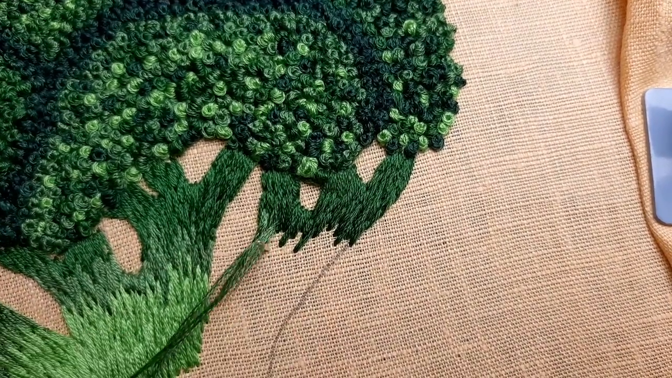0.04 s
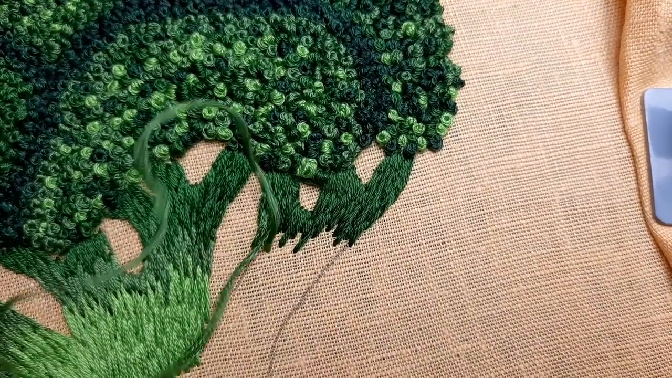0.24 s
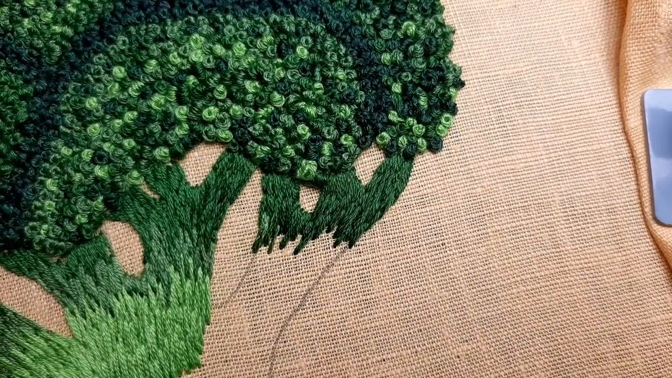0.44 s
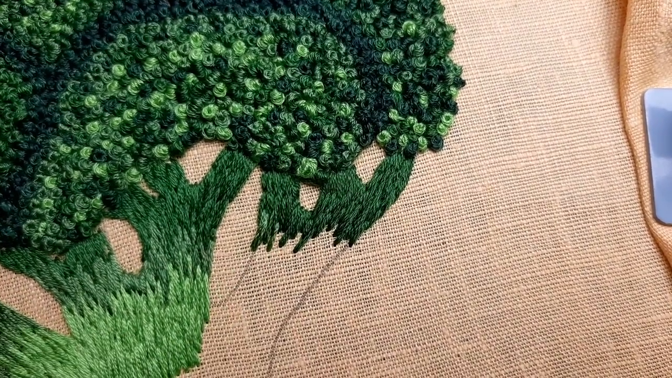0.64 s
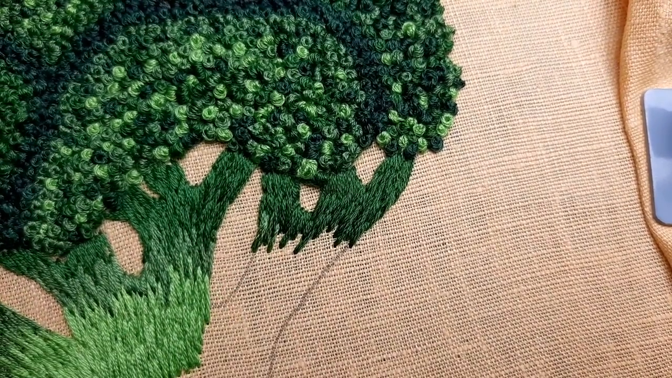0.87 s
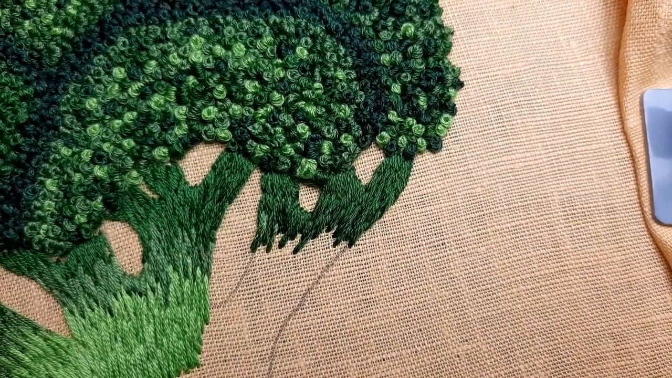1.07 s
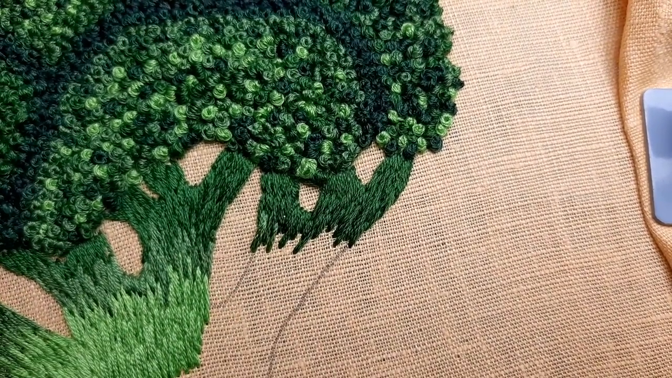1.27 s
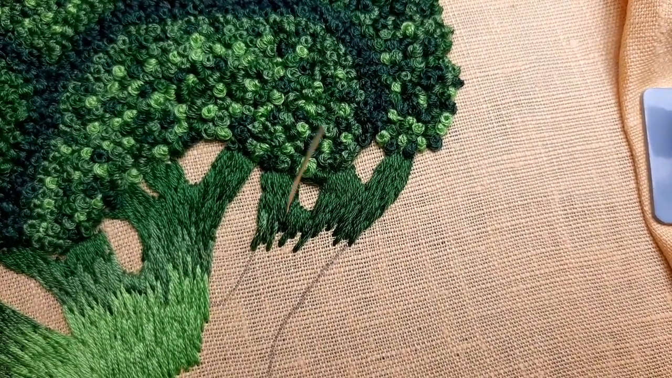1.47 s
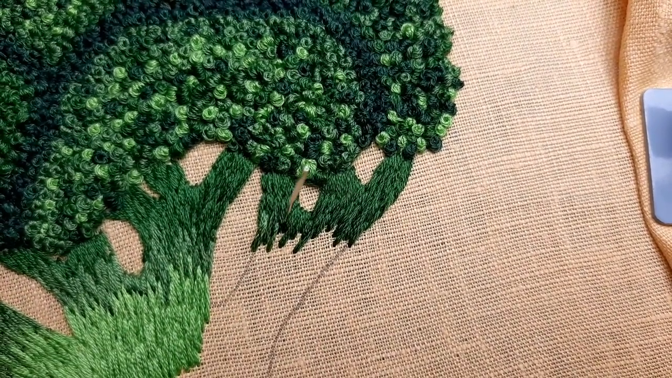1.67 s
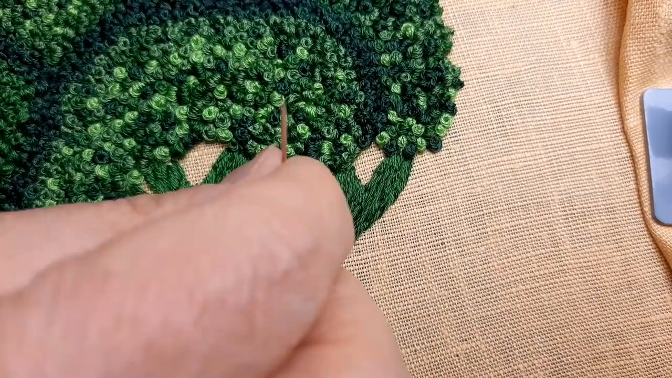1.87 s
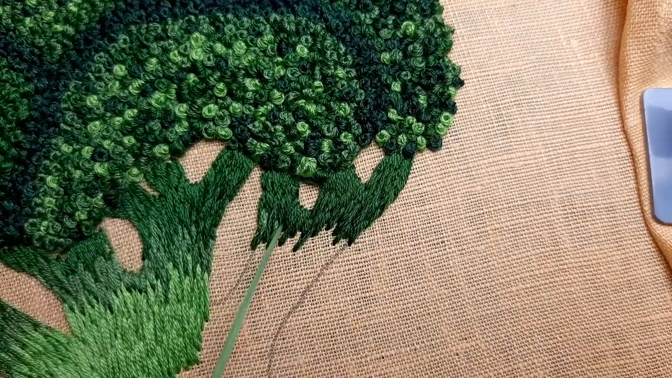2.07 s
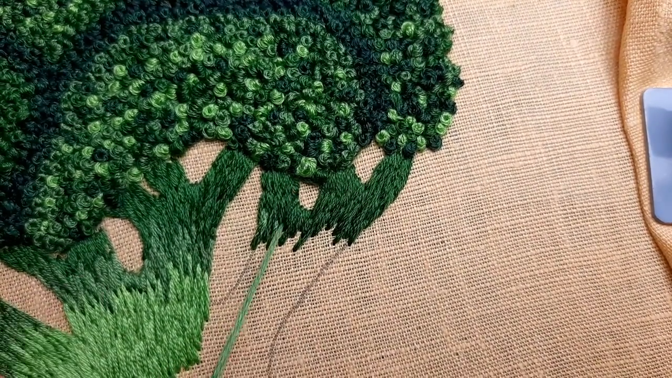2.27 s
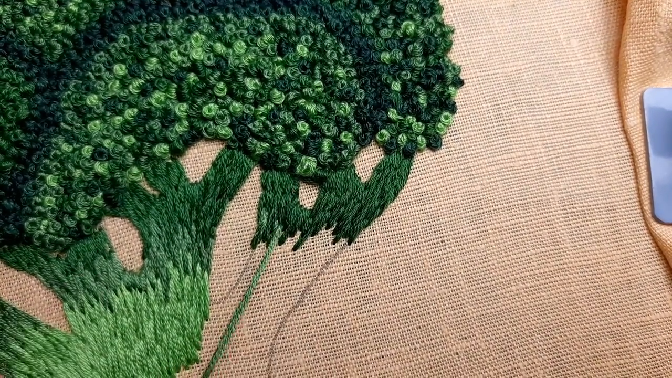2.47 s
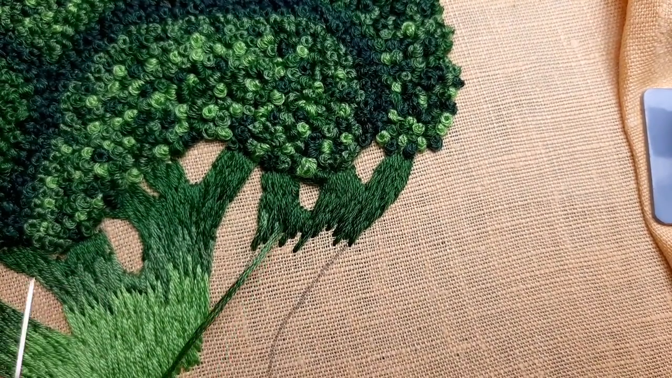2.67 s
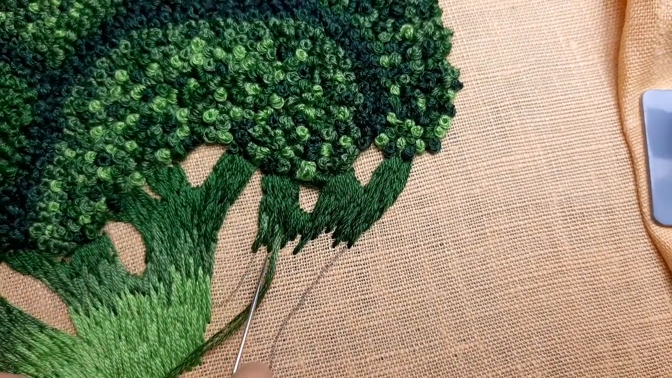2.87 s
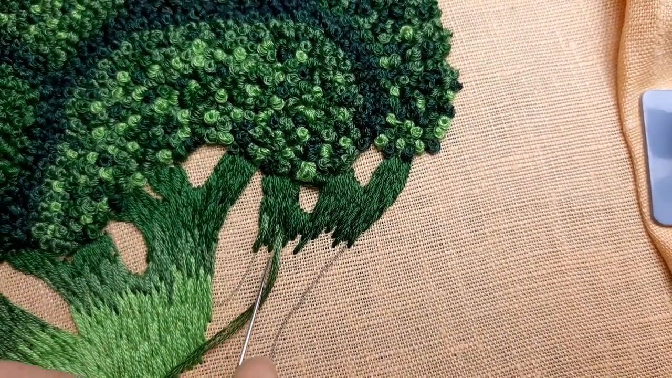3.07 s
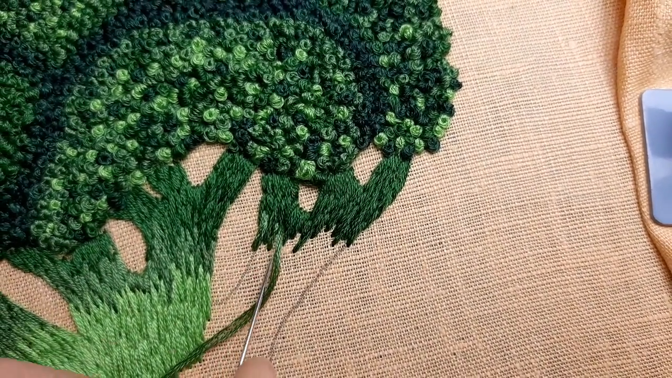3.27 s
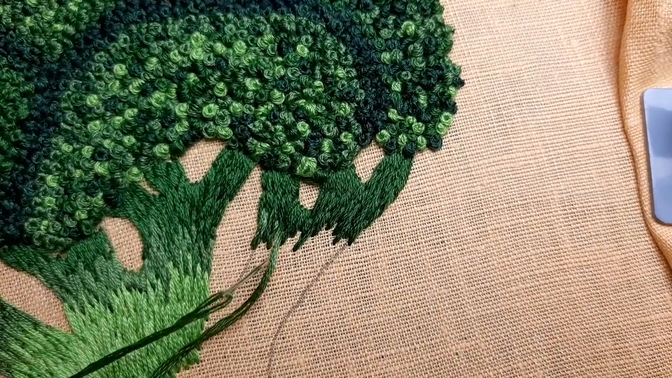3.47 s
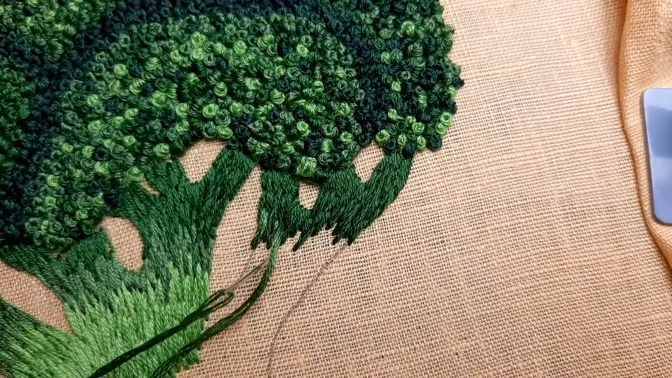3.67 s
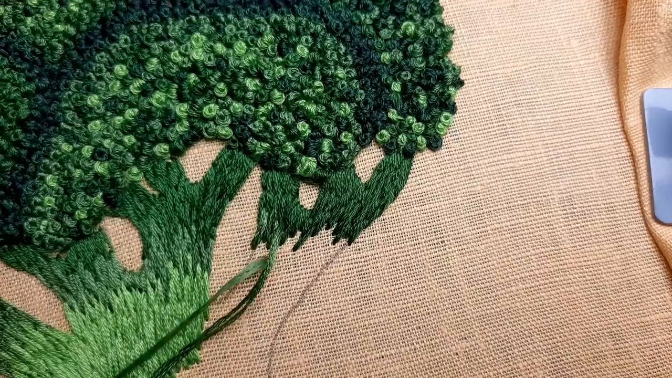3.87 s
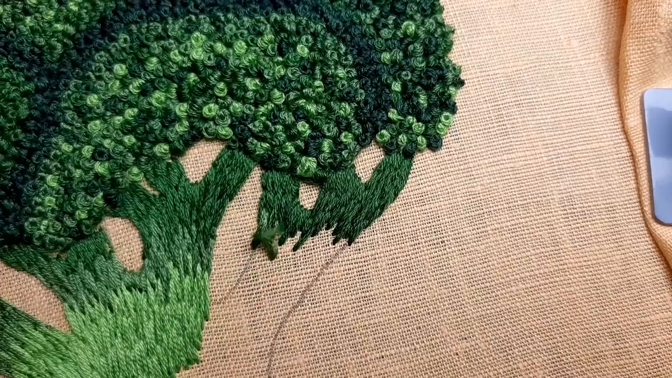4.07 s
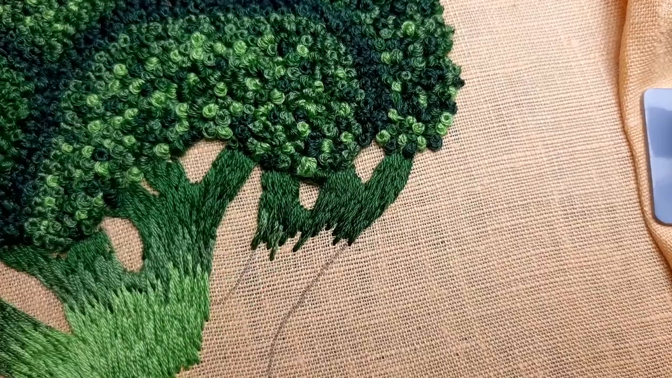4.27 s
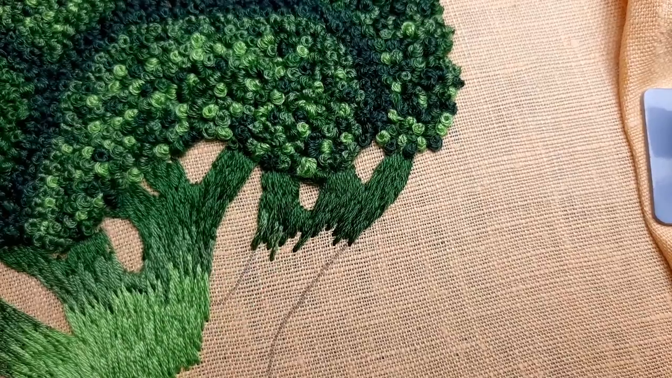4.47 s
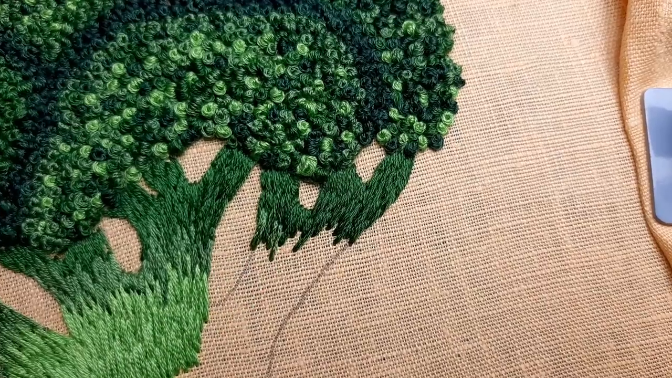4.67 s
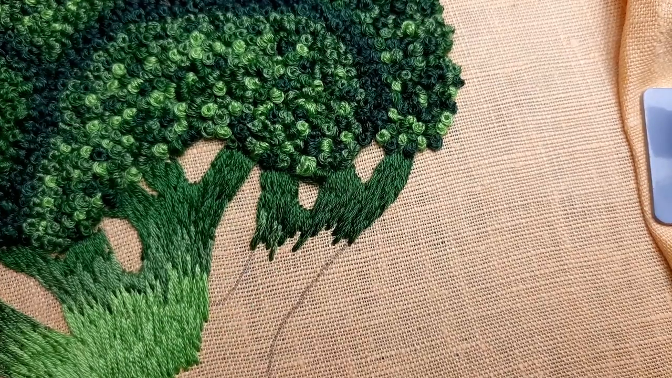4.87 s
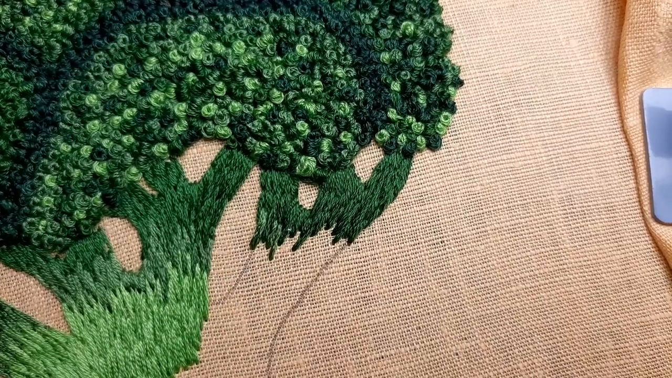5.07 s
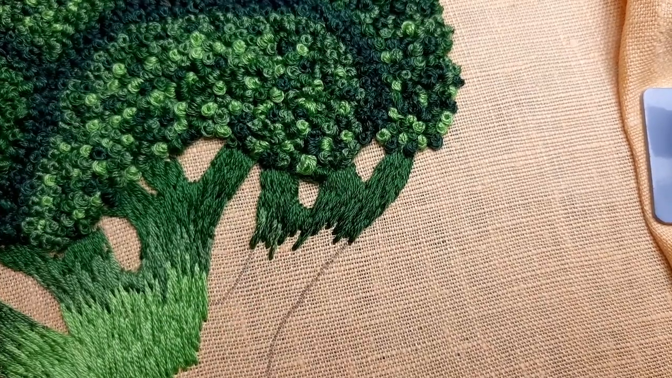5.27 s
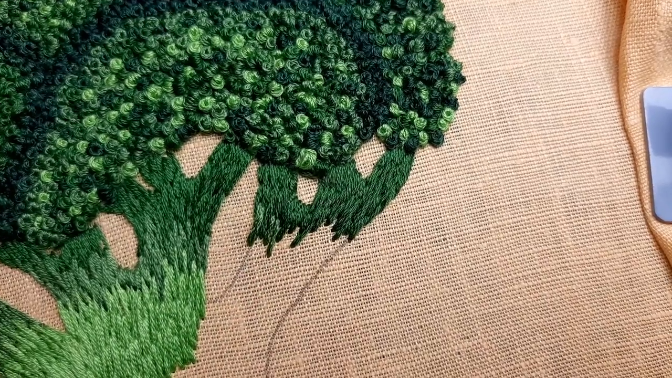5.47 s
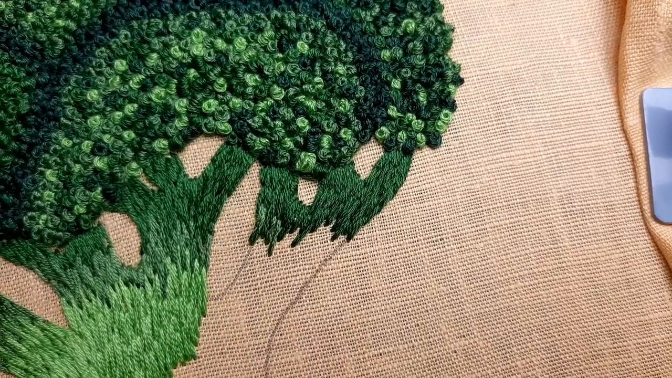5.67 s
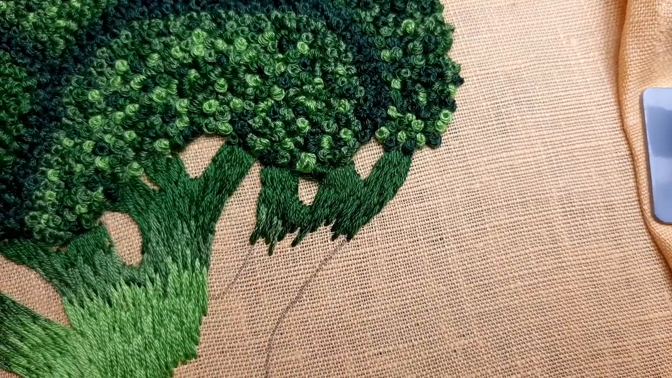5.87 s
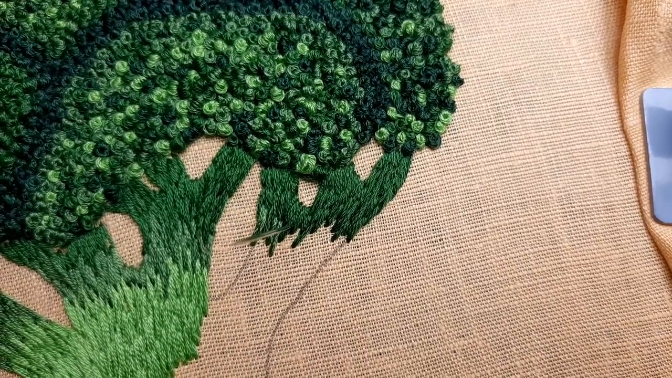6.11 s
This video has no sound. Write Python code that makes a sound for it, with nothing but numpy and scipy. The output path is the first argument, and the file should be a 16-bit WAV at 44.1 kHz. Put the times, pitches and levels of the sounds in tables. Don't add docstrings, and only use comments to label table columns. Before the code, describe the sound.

Hand embroidery heard by a close stereo pair, the work on the right. Three dull, drum-like pops each release a quarter-second scratchy thread pull. Between them fingertips tap and scuff the cloth and the frame murmurs softly. A faint hum wavers early; later a low engine drones through the wall, sags, revs, pulls away and changes gear as a crisp needle strike lands. Dry, quiet room.

```python
import sys
import numpy as np
from scipy import signal
from scipy.io import wavfile
from scipy.ndimage import uniform_filter1d

SR = 44100
rng = np.random.default_rng(int(sys.argv[2]) if len(sys.argv) > 2 else 0)


def master(y):
    cut = np.clip(np.atleast_2d(y).T, -1, 1)
    pcm = np.round(cut * 32767)
    wavfile.write(sys.argv[1], SR, pcm.astype(np.int16))


def invert_db(x):
    u = np.asarray(x, float) / 20
    return 10 ** u


N = 270758


def evened(x):
    return x / np.sqrt(np.mean(x ** 2) + 1e-20)


def read(points, hz):
    f, value = np.transpose(points)
    return np.interp(np.log(hz + 1), np.log(f + 1), value)


def curve(rows, column, rest=None):
    rows = np.array(rows)
    return np.interp(np.arange(N) / SR, rows[:, 0], rows[:, column], rest, rest)


def wander(hz):
    return evened(signal.lfilter(*signal.butter(2, hz, fs=SR), rng.standard_normal(N)))


def swells(rows, column, rise):
    t, power = np.arange(N) / SR, np.zeros(N)
    for row in rows:
        since = (t - row[0]) / row[-1]
        power += invert_db(2 * row[column] - 44.9 * np.maximum(since, -since / rise))
    return np.sqrt(power)


def flat(value):
    return lambda hz: value + 0 * hz


def closed(points, lo_hz=0, hi_hz=SR):
    lowest, highest = max(points[0][0], lo_hz), min(points[-1][0], hi_hz)
    return lambda hz: read(points, hz) - 60 * ((hz < lowest) | (hz > highest))


def noise(colour, same, lean_db, size, patchy_db, count=N):
    late_s = 4 / SR
    hz = np.fft.rfftfreq(size, 1 / SR)
    a, b, c, d, patches = rng.standard_normal((4 * count // size + 5, len(hz), 5)).T
    patches = uniform_filter1d(patches, size=5, axis=0)
    patches = evened(uniform_filter1d(patches, size=12, axis=1))
    same = np.clip(same(hz), 0, 1)[:, None]
    right = a + 1j * b
    left = same * right + np.sqrt(1 - same ** 2) * (c + 1j * d)
    left = left * np.exp(-2j * np.pi * hz * late_s)[:, None]
    lean = invert_db(lean_db(hz) / 2)[:, None]
    z = np.array([left * lean, right / lean]) * invert_db(colour(hz)[:, None] + patchy_db * patches)
    out = signal.istft(z, nperseg=size, noverlap=3 * size // 4)[1][:, :count]
    return out / np.sqrt(np.mean(out.mean(0) ** 2))


# (frequency [Hz], left minus right [dB])
WORK_LEAN = [(60, -14.5), (130, -22.5), (290, -24), (640, -12.5), (1410, -4), (3100, -16), (6820, -15.5),
             (15000, -8.5)]
# (frequency [Hz], left-right coherence [0-1])
WORK_LIKENESS = [(60, 0.44), (250, 0.79), (500, 0.39), (1000, 0.9946), (2000, 0.9), (15000, 0.52)]


def near(colour, size, patchy_db, count=N):
    return noise(colour, lambda hz: read(WORK_LIKENESS, hz), lambda hz: read(WORK_LEAN, hz),
                 size, patchy_db, count)


# (frequency [Hz], level [dB], t60 [s])
DRUM_MODES = [(95.2, -10.5, 0.41), (128, -11, 0.12), (175.2, -3, 0.22), (215.6, -2.5, 0.14),
              (251.2, 10, 0.083), (299, 5.5, 0.063), (338, 0, 0.059), (449, -7.5, 0.13), (700, -4, 0.052),
              (1026, -13.5, 0.064)]


def knocks(rows, spots_db, snap_hz, ticks_db, dull, soft_db, damping, strain_db, bounce_db,
           tick_s, snap_s, tail_db, tail_s):
    out, t = np.zeros((2, N + SR)), np.arange(SR // 2) / SR
    early = round(0.0063329 * SR)
    sides = rng.random((len(rows), len(DRUM_MODES)))
    ticks_db = np.resize(ticks_db, len(rows))
    for (s, snap_db, blow_db, lean_db, tune), side, spot_db, tick_db in zip(rows, sides, spots_db, ticks_db):
        ring = np.zeros((2, len(t)))
        for (hz, db, t60), a, b in zip(DRUM_MODES, spot_db, side):
            late = np.array([[0.41 * (b - 0.5)], [0]])
            swing = np.sin(2 * np.pi * hz * tune ** (hz > 200) * t - 0.8 - late)
            swing *= (1 - np.exp(-2.5 * hz * t)) ** 2
            ring += invert_db(db + soft_db * (hz > 400) + a - 60 * damping * t / t60) * swing
        blows = np.zeros(early + round(0.03 * SR))
        bounce = early + round((0.015 + 0.006 * rng.random()) * SR)
        blows[[0, early, bounce]] = -invert_db(strain_db), 1, -invert_db(bounce_db)
        sound = signal.fftconvolve(ring / abs(ring.mean(0)).max(), blows[None], axes=1)[:, :len(t)]
        sound *= invert_db(blow_db + 1.5)

        fibres = rng.standard_normal((2, len(t))) + 0.44 * rng.standard_normal(len(t))
        fibres += 4.77 * (t == 0)
        tick = signal.lfilter(*signal.butter(1, [2000, 10000], "band", fs=SR), fibres)
        tick += dull * (signal.lfilter(*signal.iirnotch(5700, 1.6, SR), tick) - tick)
        tick *= invert_db(snap_db + tick_db) * (np.exp(-t / tick_s) + invert_db(tail_db) * np.exp(-t / tail_s))
        snap = signal.lfilter(*signal.butter(2, [600, snap_hz], "band", fs=SR), fibres)
        snap *= invert_db(snap_db + 9) * (np.exp(-t / tick_s) + 0.27 * np.exp(-t / snap_s))
        sound[:, early:] += (tick + snap)[:, :-early]
        at = round(s * SR) - early
        out[:, at:at + len(t)] += sound * invert_db([[lean_db / 2], [-lean_db / 2]])
    return signal.sosfilt(signal.butter(6, 80, "high", fs=SR, output="sos"), out[:, :N])


# (time [s], snap [dB], blow [dB], left minus right [dB], drum tuning [factor])
NEEDLE_POPS = [
    (0.1275, -36, -23.5, -14.5, 0.93),
    (1.932, -43.5, -19, -11, 0.94),
    (3.8567, -40.5, -22.5, -14, 1.028),
]
# (level on each drum mode [dB], ..)
NEEDLE_SPOTS = [
    [0, -3, 5.5, -1.5, 1, -0.5, -6, -3, 0.32, 0],
    [0, 7, 4.4, 2, -2, -2.5, 0, 0, 1.1, 0],
    [0, 6.5, 3, 3, 2, -2.5, -4, 7, 0, 0],
]


def pops():
    return knocks(NEEDLE_POPS, NEEDLE_SPOTS, snap_hz=1990, ticks_db=[-15, -16, -11.5], dull=0.48,
                  soft_db=1.2, damping=1.48, strain_db=-16, bounce_db=-10.5,
                  tick_s=0.00055, snap_s=0.0099, tail_db=-7.5, tail_s=0.012)


# (time [s], snap [dB], blow [dB], left minus right [dB], drum tuning [factor])
POINT_STRIKES = [
    (2.8593, -36, -38.5, -11, 1.161),
    (5.0412, -33, -21, -10.5, 1.045),
]
# (level on each drum mode [dB], ..)
POINT_SPOTS = [
    [-5, 0, 3, 3.4, 0.7, -1.5, 5, 2.5, 4, 0],
    [-0.5, 0, -4.5, 5.9, -1.6, -2, 1, 0, 2, 0],
]


def pierces():
    return knocks(POINT_STRIKES, POINT_SPOTS, snap_hz=2100, ticks_db=[-11.5, 0.5], dull=0.05,
                  soft_db=-1.2, damping=1.76, strain_db=-47, bounce_db=-15,
                  tick_s=0.00061, snap_s=0.0082, tail_db=-21.5, tail_s=0.02)


# (start [s], length [s], drag [dB], fibre hiss [dB],
# early peak of the speed arch [exponent], hiss share of the length [0-1])
THREAD_PULLS = [
    (0.135, .29, -53.5, -58, 0.66, 0.93),
    (1.942, .29, -52.5, -61, 0.63, 1),
    (2.151, 0.23, -61.5, -75, 0.75, 1),
    (3.862, .26, -52, -56, 0.66, 0.99),
]
# (frequency [Hz], density [dB per Hz])
PULL_COLOURS = [
    [(350, -5), (600, 2.5), (726, -7), (788, 9), (1190, 0), (1500, 7.5), (1840, -13), (2060, -6),
     (2300, -15.5), (3790, -20), (4300, -17), (4660, -14.5), (5120, -28), (5790, -30), (9090, -17.5),
     (10900, -24.5), (15700, -17.5)],
    [(350, -11), (490, -5.5), (600, -21), (651, -22), (717, -0.5), (1240, -7), (1540, -2), (1770, -13.5),
     (2380, -19.5), (3400, -35.5), (4150, -28), (4500, -20), (5050, -36), (5800, -28), (6250, -21.5),
     (6920, -32.5), (8730, -28), (15700, -26)],
    [(350, -49), (600, -16), (717, 2.5), (981, -1.5), (1080, -3), (1290, -10.5), (1520, 3), (1940, -22.5),
     (2170, -7.5), (2600, -19), (4660, -17.5), (5560, -36), (7010, -19), (9730, -21), (15700, -23.5)],
]
# (frequency [Hz], density [dB per Hz])
SLOW_COLOUR = [(350, -7), (485, -5), (560, -22), (740, -16), (1190, -30.5), (1500, -16.5), (1850, -30),
               (2600, -41), (4500, -42), (5200, -42), (6200, -34), (7000, -41), (15700, -34)]


def thread():
    split_hz, grain_db = 1800, 2.0
    jerk_db, jerk_s = 12.5, 0.015
    running_start, db_per_decade = 0.06, 27
    squareness = np.array([[2.84], [1.8]])
    out = np.zeros((2, N))
    colours = PULL_COLOURS[:2] + [SLOW_COLOUR] + PULL_COLOURS[2:]
    for (start, length, drag_db, hiss_db, early, share), colour in zip(THREAD_PULLS, colours):
        t = np.arange(0, length, 1 / SR)
        count, at = len(t), round(start * SR)
        progress = running_start + (1 - running_start) * t / length / np.array([[1], [share]])
        off_peak = abs(2 * progress ** early - 1)
        tension, speed = np.log10((1 - off_peak ** squareness).clip(1e-3))
        twists_db = 0.61 * wander(54)[:count]
        drag_db = drag_db + jerk_db * np.exp(-t / jerk_s) + db_per_decade * tension + twists_db
        hiss_db = hiss_db + db_per_decade * speed + twists_db
        drag = near(closed(colour, 0, split_hz), 512, grain_db, count)
        drag *= invert_db(drag_db + grain_db * wander(180)[:count])
        hiss = near(closed(colour, split_hz), 1024, 2.7, count)
        hiss *= invert_db(hiss_db + grain_db * wander(330)[:count])
        out[:, at:at + count] += (drag + hiss) * np.minimum(t / 0.0031, 1)
    return out


# (time [s], snap [dB], blow [dB], left minus right [dB], drum tuning [factor])
FINGER_TAPS = [(0.897, -87, -53, -20, 0.86), (0.968, -62.5, -56, -14, 0.91), (1.036, -75, -52, -18, 0.93),
               (1.046, -66, -52.5, -20.5, 1.18), (1.68, -62, -61, -6, 2.54),
               (1.787, -80, -49.5, -18.5, 1.04), (1.818, -79, -48, -12, 1.1), (1.847, -72, -52, -6, 0.98),
               (2.441, -65, -48, -5.5, 1.35), (2.588, -77.5, -57.5, 3.5, 1.8),
               (3.018, -70, -41.5, -12.5, 0.98), (3.262, -65, -40, -9.5, 1.02),
               (3.408, -75, -48, -14.5, 1.34), (3.712, -70, -47.5, -1, 0.74), (3.743, -72, -50, -16, 1.13),
               (4.644, -92, -48.5, -14, 0.98), (4.701, -76, -53, -1, 1.51),
               (4.807, -58.5, -43.5, -10.5, 1.28), (4.894, -56, -41.5, -8, 1.186),
               (4.972, -69, -43.5, -13, 1), (5.541, -63, -38, 7, 1.06), (6.024, -73, -48, -16.5, 0.97),
               (1.156, -68, -66, -12, 1.2), (3.234, -83, -57, -3, 0.89), (4.773, -73, -52.5, -1, 1.4),
               (5.724, -82, -59.5, -7, 1.9), (0.398, -58, -59.5, -13, 1.6)]


def taps():
    spots_db = 10 * (rng.random((len(FINGER_TAPS), len(DRUM_MODES))) - 0.5)
    return knocks(FINGER_TAPS, spots_db, snap_hz=2000, ticks_db=-7, dull=0.9,
                  soft_db=-6.5, damping=1.69, strain_db=-45, bounce_db=-10,
                  tick_s=0.0012, snap_s=0.008, tail_db=-10, tail_s=0.019)


# (time [s], level [dB], time to die 20
# dB [s])
SKIN_SCUFFS = [(.468, -58, 0.08), (.488, -65, 0.06), (.503, -64, .035), (1.036, -71, .04),
               (1.048, -65, .05), (1.68, -68, 0), (1.79, -71.5, 0.06), (1.845, -71, 0.13), (2.862, -68, 0),
               (3.019, -69, 0), (3.264, -72.5, 0.1), (3.385, -61, 0.1), (3.408, -61, -0.21),
               (3.745, -69, .06), (4.809, -66, 0.06), (4.896, -61.5, -0.01), (4.974, -69, -0.03),
               (5.044, -60, 0.03), (5.543, -72, 0.1), (5.6, -75, 0.16)]
# (frequency [Hz], density [dB per Hz])
SCUFF_COLOUR = [(500, -5), (750, 5), (1600, -6), (2100, -22), (4500, -24.5), (7000, -31)]
# (middle [s], length [s], top fizz [dB], lower fizz [dB])
YARN_BRUSHES = [(.06, 0.15, -77.5, -82.5), (0.507, 0.097, -80, -82.5), (0.577, 0.086, -76, -80.5),
                (0.631, 0.058, -75, -84), (0.707, 0.1856, -80, -87), (0.824, 0.073, -75, -77),
                (1.063, 0.26, -94, -89.5), (1.457, 0.15, -84, -89), (1.7, 0.0475, -91, -97),
                (1.825, 0.094, -81, -85), (1.985, 0.025, -58, -64), (2.308, 0.19, -82, -83.5),
                (2.537, 0.14, -88, -89), (2.743, 0.14, -72, -72), (3.39, 0.11, -72.5, -71.5),
                (3.797, 0.22, -82.5, -84.5), (4.235, .04, -84, -80), (4.375, 0.091, -78.5, -80),
                (4.466, 0.11, -83, -97), (4.543, 0.092, -72.5, -81), (4.893, 0.068, -97, -93),
                (5.584, .16, -82.5, -79), (5.69, 0.15, -83.5, -85.5), (6.01, 0.22, -82, -85)]
# (frequency [Hz], density [dB per Hz])
FIZZ_COLOUR = [(3530, -43), (6000, -12.5), (8050, -10), (8790, -4), (10500, -8), (11900, -4), (13300, -1.5),
               (14900, -1), (15700, 3.5)]
FIZZ_SPLIT_HZ = 11900


def fingers():
    bursts = [(s, db, max(die, 0.013875)) for s, db, die in SKIN_SCUFFS]
    scuff = near(closed(SCUFF_COLOUR), size=256, patchy_db=2.0)
    scuff *= swells(bursts, 1, rise=0.08) * invert_db(0.73 * wander(200))
    strokes = np.zeros((2, N))
    for s, length, *db in YARN_BRUSHES:
        at, count = max(round((s - length / 2) * SR), 0), round(length * SR)
        strokes[:, at:at + count] += invert_db(db)[:, None] * signal.windows.tukey(count, 0.7)
    top = near(closed(FIZZ_COLOUR, FIZZ_SPLIT_HZ), size=256, patchy_db=2.0)
    lower = near(closed(FIZZ_COLOUR, 0, FIZZ_SPLIT_HZ), size=256, patchy_db=2.0)
    return scuff + invert_db(0.93 * wander(300)) * (strokes[0] * top + strokes[1] * lower)


# (time [s], cloth boom [dB], frame rustle [dB], time to die 20 dB [s])
HAND_TOUCHES = [(.02, -49.5, -59, 0.03), (.055, -53, -62, 0.04), (.17, -48.5, -55, 0.17),
                (.3, -54, -61, 0.31), (.9, -63, -68, 0.05), (1.06, -65, -64.5, 0.68), (1.33, -71, -64, 0.3),
                (1.45, -67, -59, .04), (1.51, -67, -91, 0.4565), (1.795, -56.5, -58, 0.01),
                (1.82, -55, -55, 0.03), (1.85, -60, -53, .025), (1.905, -68, -76, -0.3),
                (2.02, -46.5, -47, 0.28), (2.25, -51, -61, 0.45), (2.83, -60, -60.5, 0.68),
                (3.1, -61.5, -68.5, 0.5), (3.405, -59, -51.5, 0.24), (3.55, -64, -64.5, 1.0),
                (3.75, -40, -48.5, 0.04), (3.9, -48, -54, 0.15), (4.03, -51, -52, 0.42),
                (4.65, -63, -69, .5), (4.9, -69.5, -71, 0.56), (5.01, -55, -65, 0.32),
                (5.12, -57.5, -60, 0.26), (5.56, -53.5, -50.5, 0.16), (6.04, -69, -67, 0.7)]
# (frequency [Hz], density [dB per Hz])
BOOM_COLOUR = [(60, -38.5), (75, -22.5), (88, -6.5), (105, -28), (133, -7), (165, 3.5), (195, -10.5),
               (230, -2.5), (280, -2.5)]
# (frequency [Hz], density [dB per Hz])
RUSTLE_COLOUR = [(200, -28), (340, 11), (355, -2), (381, -8), (404, 7), (473, 2), (561, -8), (641, -7.5),
                 (725, -8.5), (780, -27.5), (840, -33.5), (1020, -26.5), (1100, -52), (1430, -60.5),
                 (2420, -120)]
# (time [s], level [dB], time to die 20 dB [s])
HOLLOW_SWELLS = [(.26, -57.5, 1), (1.35, -53, 0.2), (2.02, -60, -0.1), (2.35, -53, 1.5)]


def handling():
    touch_rise = 0.73
    boom = near(closed(BOOM_COLOUR), size=2048, patchy_db=2.0)
    boom *= swells(HAND_TOUCHES, 1, touch_rise) * invert_db(wander(40))
    rustle = noise(closed(RUSTLE_COLOUR), flat(0.76), flat(-4.0), size=2048, patchy_db=3.0)
    rustle *= swells(HAND_TOUCHES, 2, touch_rise) * invert_db(1.8 * wander(30))
    peak = lambda hz: -20 * np.log10(1 + (2 * (hz - 299) / 28.3) ** 2)
    hollow = noise(peak, flat(0.78), flat(-1.5), size=4096, patchy_db=2.5)
    rest_db = np.where(np.arange(N) < 2.4 * SR, -67.0, -60.0)
    rest = invert_db(uniform_filter1d(rest_db, size=4000))
    return boom + rustle + np.hypot(rest, swells(HOLLOW_SWELLS, 1, 0.5)) * hollow


# (frequency [Hz], level [dB])
WALL_COLOUR = [(70, -31.5), (160, -8), (225, -5.5), (265, -9.5), (300, 7.5), (335, 3), (385, -6),
               (450, -21.5), (520, -35.5), (620, -38), (690, -38.5), (760, -40), (1000, -69)]


def engine(rows, strongest, rough, orders_db):
    hz, level_db = uniform_filter1d(curve(rows, 1), size=2000), curve(rows, 2, -120)
    turns = np.cumsum(hz) / SR + rough * wander(14) / (2 * np.pi)
    wall_db = read(WALL_COLOUR, strongest * hz)
    base_db = uniform_filter1d(level_db, size=300) - wall_db
    smooth = uniform_filter1d(invert_db(curve(rows, -1, -120) - wall_db), size=7000)
    mean_db = 20 * np.log10(abs(smooth) + 1e-9)
    out = np.zeros(N)
    for k, db in enumerate(orders_db, 1):
        order_db = base_db if k == round(strongest) else mean_db
        order_db = order_db + read(WALL_COLOUR, k * hz) + db + 0.89 * wander(30)
        out += np.sqrt(2) * invert_db(order_db) * np.sin(2 * np.pi * (k * turns + rng.random()))
    return out


# (time [s], firing rate [Hz], strongest order [dB], other orders [dB])
ENGINE_IDLE = [(2.28, 74, -94, -58), (2.39, 76.2, -46, -49), (2.5, 80.17, -54, -60),
               (2.56, 82.42, -63, -73), (2.7, 82.04, -54.5, -64.5), (2.84, 82.13, -45.5, -50),
               (2.95, 80.96, -57, -53), (3.1, 78.9, -62, -52.5), (3.24, 76.8, -67, -54)]
ENGINE_SAG = [(3.2, 76.27, -64, -60), (3.27, 75.94, -53.5, -45.5), (3.39, 73.94, -43, -49.5),
              (3.44, 72.6, -65, -62), (3.52, 73.23, -49.5, -66), (3.68, 73.7, -52, -49.5),
              (3.742, 74.94, -41, -55), (3.83, 74.8, -43.5, -56), (3.95, 77.57, -54, -63)]
# (time [s], firing rate [Hz], strongest order [dB])
ENGINE_BLIP = [(3.98, 70.7, -54), (4.05, 72, -50), (4.12, 73.94, -46.5), (4.23, 75.2, -46),
               (4.33, 76.33, -63.5), (4.45, 75.5, -63.5)]
ENGINE_START = [(3.95, 80.6, -91), (4.1, 81.44, -49.5), (4.25, 81.7, -49.5), (4.42, 83.3, -59),
                (4.5, 81.1, -62)]
ENGINE_CLIMB = [(4.45, 84.9, -75), (4.62, 91.4, -61), (4.68, 94.9, -50.5), (4.706, 97.7, -39),
                (4.726, 96.1, -59), (4.752, 95.8, -41), (4.89, 100.6, -39.5), (4.93, 100.2, -43.5),
                (4.96, 102, -74)]
ENGINE_AWAY = [(4.95, 103.4, -59), (5.02, 106.7, -54), (5.1, 110, -47.5), (5.2, 111.3, -60.5),
               (5.3, 116.8, -72.5), (5.42, 118.7, -72), (5.5, 119, -90)]
ENGINE_SHIFT = [(5.44, 75.25, -77.5), (5.5, 74.53, -43), (5.57, 75.86, -37.5), (5.64, 73.43, -38.5),
                (5.69, 72.65, -61), (5.8, 75.5, -73.5), (5.92, 75.5, -52), (6.05, 71, -87),
                (6.14, 74.5, -82)]
CYLINDERS = {"idle": [0, 5.5, 2, -0.5, 1.5, -1.5, 5], "sag": [-1.5, 3, 6, 0.5, 1.5, -4, 5], "blip": [-18,
             -12, -9, 0.5, -6, -11.5, -17], "start": [-8, -0.5, -7.5, 0.5, -6.5, -5, -7], "climb": [-9, -7,
             0.5, -10.5, -10, -11, -13], "away": [-9, 8, 0, -7.5, -10, -12, -15], "shift": [-40.5, -29.5,
             -9.5, -0.5, -17.5, -30, -42]}
# (time [s], level [dB])
HUM_LEVEL = [(.5, -76), (.75, -75), (1.1, -64.5), (1.42, -63.5), (1.55, -75.5), (1.9, -83), (2.0, -90)]


def street():
    drone = engine(ENGINE_IDLE, 4.03, 0.008, CYLINDERS["idle"])
    drone += engine(ENGINE_SAG, 4.04, 0.008, CYLINDERS["sag"])
    drone += engine(ENGINE_BLIP, 4.054, 0.026, CYLINDERS["blip"])
    drone += engine(ENGINE_START, 3.83, 0.03, CYLINDERS["start"])
    drone += engine(ENGINE_CLIMB, 3.032, 0.054, CYLINDERS["climb"])
    drone += engine(ENGINE_AWAY, 2.97, 0.05, CYLINDERS["away"])
    drone += engine(ENGINE_SHIFT, 3.918, 0.036, CYLINDERS["shift"])
    shake = uniform_filter1d(drone ** 2, size=4000).clip(0) ** 0.34
    pane_hz, pane_width_hz = 684, 20
    buzz = signal.lfilter(*signal.iirpeak(pane_hz, pane_hz / pane_width_hz, SR), rng.standard_normal(N))
    hum = np.sin(2 * np.pi * 378.5 * np.arange(N) / SR + 0.29 * wander(2.2))
    hum *= np.sqrt(2) * invert_db(curve(HUM_LEVEL, 1, -120))
    return (drone + invert_db(-40.5) * shake * evened(buzz) + hum) * invert_db([[-0.7], [0.7]])


# (frequency [Hz], density [dB per Hz])
HISS_COLOUR = [(25, -6), (50, 0.5), (70, 18.5), (120, 25), (250, 13), (500, 22.5), (800, 9.5), (1400, 2.5),
               (2000, 2), (4000, 1.5), (8000, -3.5), (12000, -7), (16000, -6.5)]


def room_hiss():
    hiss = noise(closed(HISS_COLOUR, 0, FIZZ_SPLIT_HZ), flat(0.11), flat(-1.5), size=1024, patchy_db=0.5)
    return invert_db(-71.5) * hiss


def scene():
    work = pops() + pierces() + thread() + taps() + fingers() + handling()
    return work + street() + room_hiss()


def low_pass(x):
    return signal.sosfilt(signal.butter(12, 16840, fs=SR, output="sos"), x)


def record(dry):
    edge = signal.firwin(255, 16500, window=("kaiser", 8), fs=SR)
    opened = dry * np.minimum(np.arange(N) / (0.0041 * SR), 1)
    mix = signal.oaconvolve(opened, edge[None], "same")
    return low_pass(mix)


dry = scene()
out = record(dry)
master(out)
```